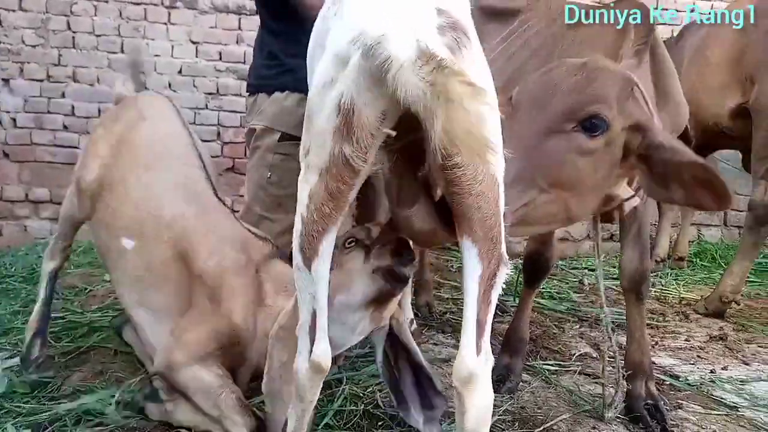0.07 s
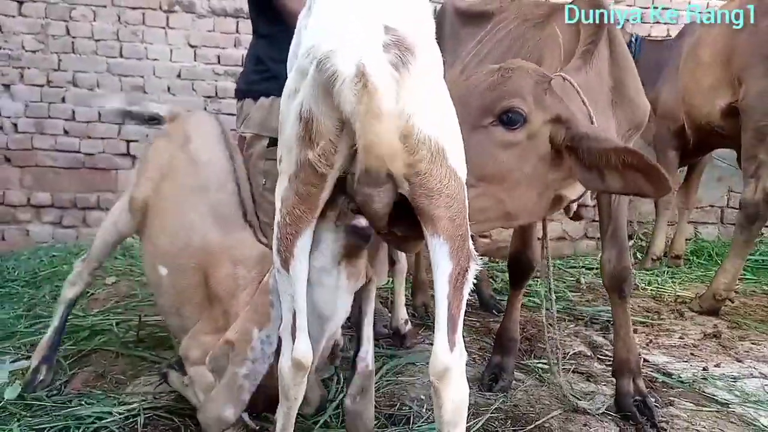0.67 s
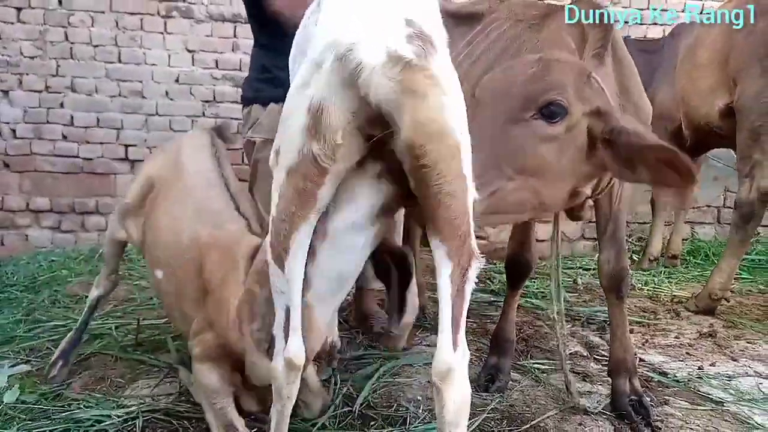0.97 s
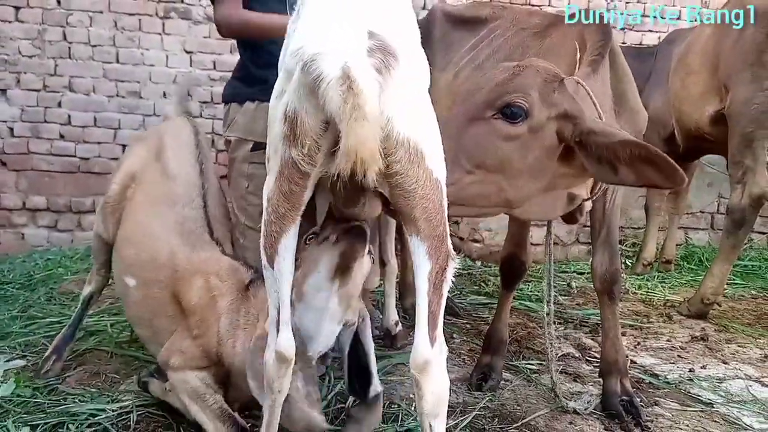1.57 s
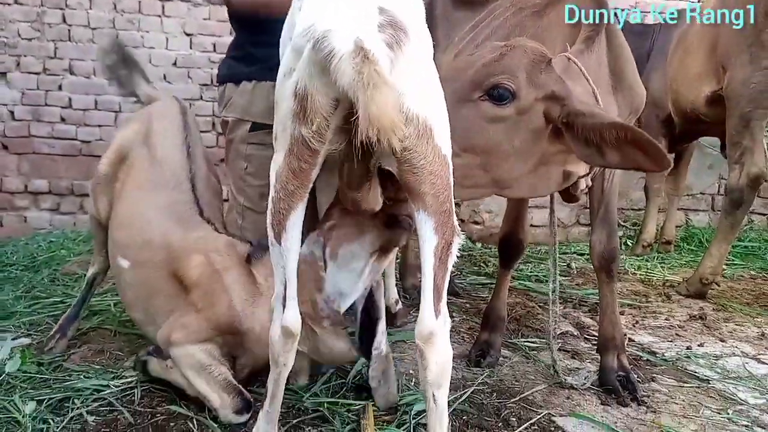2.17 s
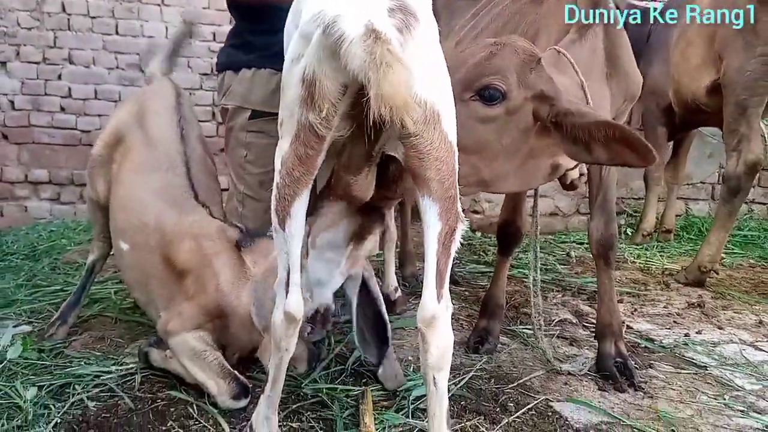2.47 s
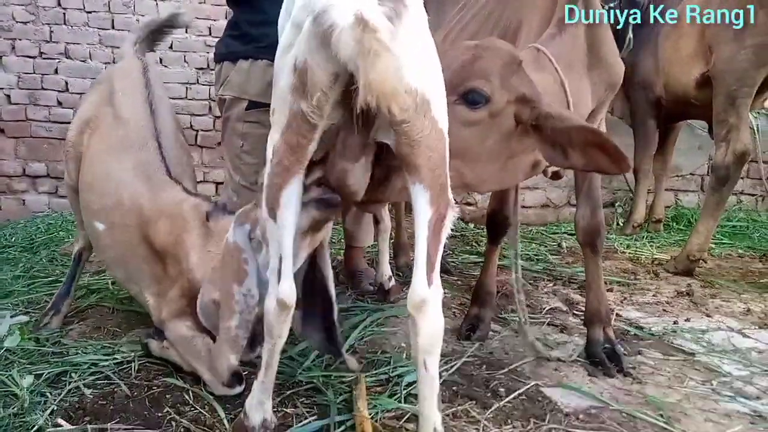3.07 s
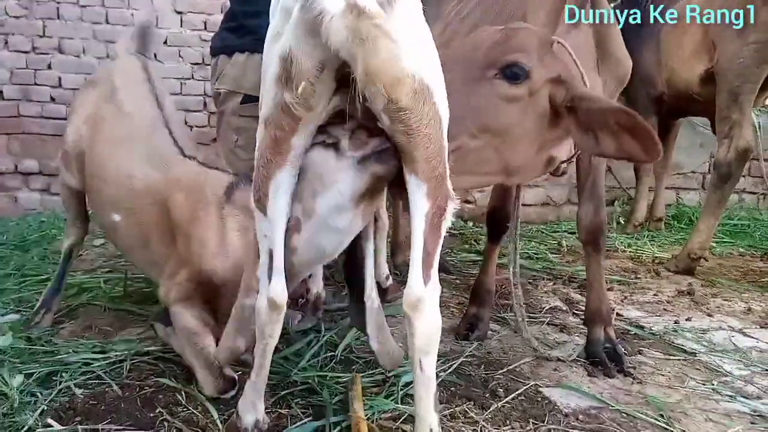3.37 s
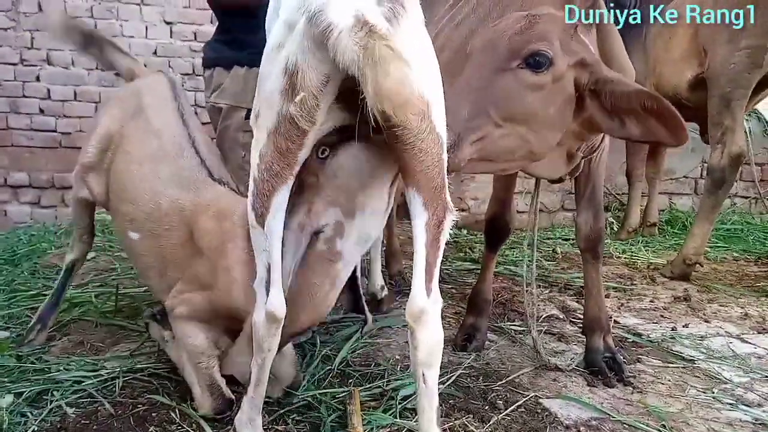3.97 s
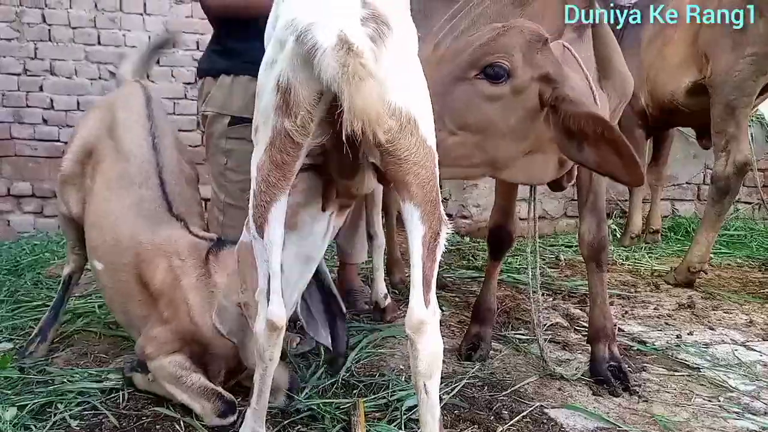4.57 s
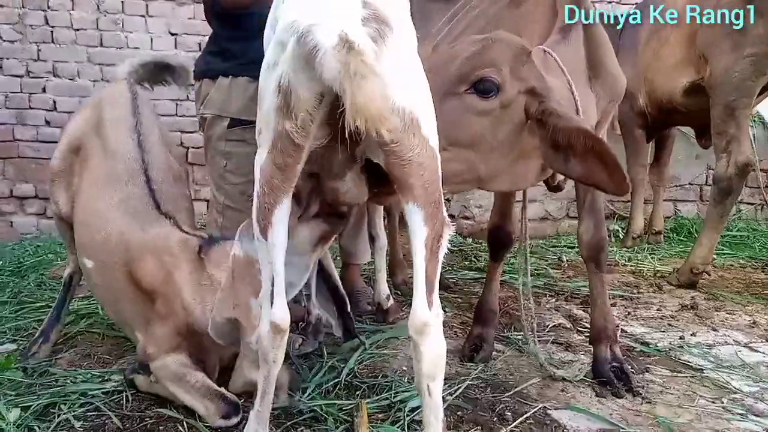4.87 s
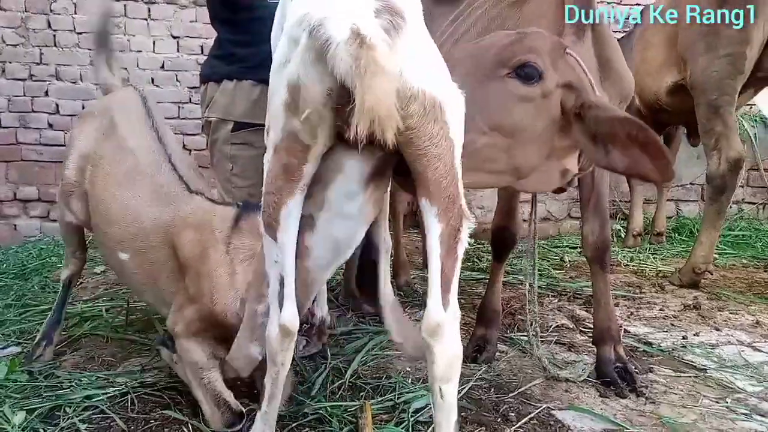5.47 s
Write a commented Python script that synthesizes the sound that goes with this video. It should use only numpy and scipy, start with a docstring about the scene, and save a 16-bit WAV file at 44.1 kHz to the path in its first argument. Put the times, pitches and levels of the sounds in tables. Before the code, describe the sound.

A bird gives four high, raspy, falling whistles while farm animals shuffle and thud on cut grass over a steady outdoor hiss.

```python
"""A brick-walled farmyard. A bird calls four times: each call is a rasp, a clean whistle and a falling slide.
Small birds slur and chip thinly farther off. A suckling young animal and the stock around it shuffle
on cut grass, with soft thuds, rustles and snapping stalks over a steady outdoor hiss and rumble.
Birds are gliding tones, thuds damped resonances, rustles dense clicks; the walls reflect them."""
import sys
import numpy as np
from scipy import signal
from scipy.fft import rfft, irfft, next_fast_len
from scipy.io import wavfile
from scipy.ndimage import uniform_filter1d

SR = 44100
rng = np.random.default_rng(int(sys.argv[2]) if len(sys.argv) > 2 else 0)


def wav_out(sig):
    """Save sig, one row per channel (or a flat mono array), as 16-bit PCM at SR to the path in sys.argv[1]."""
    wavfile.write(sys.argv[1], SR, np.round(np.clip(np.atleast_2d(sig).T, -1, 1) * 32767).astype(np.int16))


N = 242991

# Spectrum of cut grass. Each row: frequency in Hz, relative density in dB.
GRASS_SPECTRUM = [(290, -70.5), (500, -8.5), (941, -1.5), (1010, -0.5), (1250, -6.5), (1770, 3),
                  (2260, 1.5), (2890, 7), (4380, 4.5), (5590, 6), (9510, -2), (13600, -22), (15500, -16)]


def near_bird():
    """Four calls, each with its own pitch and level contour."""
    # Each row: start in seconds; rasp pitch in Hz, bend in Hz/s, level in dB; whistle pitch in Hz,
    # drift in Hz/s, level in dB, crest as a share of its length, start and end in dB re crest;
    # slide level in dB; overtone gain in dB.
    calls = [(.536, 3124, -400, -32.5, 2640, -200, -21, 0.6, -2, -18, -24.5, -3),
             (1.018, 3036, -900, -31, 2672, 148, -20, 0.59, -8.5, -22, -22.5, -4),
             (1.494, 2898, 596.5, -32.5, 2584, -100, -21, 0.69, -11, -30, -24, 0),
             (1.961, 2969, 2413, -31, 2513, 893, -19, 0.34, -5, -40, -24.5, -3.5)]
    return track(syrinx, [(s, call_contour(*shape), facing_db) for s, *shape, facing_db in calls])


def call_contour(rasp_hz, bend_hz_per_s, rasp_db, whistle_hz, drift_hz_per_s, whistle_db,
                 crest, start_db, end_db, slide_db):
    """Pitch, level and roughness: a short rasp, a swelling whistle, a last push as the pitch sinks."""
    rasp_s, whistle_s, slide_s = .075, .128, .11
    t = np.arange(0, rasp_s, 1 / SR)
    onset_db = 20 * np.log10(np.clip(t / .018, 1e-3, 1))
    fade_db = 397 * np.maximum(t - .039, 0)
    rasp = [rasp_hz + bend_hz_per_s * (t - rasp_s / 2),
            rasp_db + onset_db - fade_db,
            np.minimum(.3 + t / .033, 1)]

    t = np.arange(0, whistle_s, 1 / SR)
    off_crest = t / whistle_s - crest
    arch_db = np.where(off_crest < 0, start_db * (off_crest / crest) ** 2,
                       end_db * (off_crest / (1 - crest)) ** 2)
    unsettled = np.exp(-t / .005)  # enters sharp, soft and rough, then locks
    hz = whistle_hz + drift_hz_per_s * (t - whistle_s / 2) + 134 * unsettled
    whistle = [hz, whistle_db + arch_db - 6 * unsettled, .012 + .5 * unsettled]

    t = np.arange(0, slide_s, 1 / SR)
    rest_hz, fall_s, rise_s = 1348, .05, .014  # pitch sinks toward the slack membranes' rest
    push_db = np.interp(t, [0, rise_s], [slide_db - 25.5, slide_db])
    slide = [rest_hz + (hz[-1] - rest_hz) * np.exp(-(t / fall_s) ** 1.3),
             push_db - 336 * np.maximum(t - rise_s, 0),
             np.full(len(t), .13)]
    return uniform_filter1d(np.hstack([rasp, whistle, slide]), size=130, axis=1)


def syrinx(contour, facing_db, jitter=.02, waver=.0026, flutter=.45):
    """The syrinx starts rough with its period doubled, locks into a whistle, then slackens."""
    # Overtones leaving the beak. Each row: frequency in Hz, relative level in dB.
    beak = [(3000, -15), (4200, -24), (5200, -25), (6500, -21.5), (7900, -23), (9000, -41.5),
            (10400, -28.5), (11400, -58), (13200, -52), (15400, -52)]
    # Lines of the rasp. Each row: multiple of half the pitch, relative level in dB.
    half_lines = [(1, -20.5), (3, -12), (5, -12), (7, -26.5)]
    hz, level_db, rough = contour
    count = len(hz)
    shake = jitter * rough * wobble(count, 185) + waver * wobble(count, 210)
    phase = 2 * np.pi * np.cumsum(hz * (1 + shake)) / SR
    slack = np.clip((2440 - hz) / 200, 0, 1)  # slack membranes feed the low overtones
    doubling = rough * (1 - slack)
    slip_rad = .51 * slack * wobble(count, 200)  # uneven cycles blur the slide's overtones
    buzz_db = facing_db + 4 * slack + 7 * doubling
    buzz_db += .46 * (1 - slack) * np.minimum(level_db.max() - level_db, 10)  # overtones swell less
    tone = np.sin(phase)
    for k in range(2, 7):
        overtone_db = at_hz(beak, k * hz) + buzz_db - 2.5 * (k - 3) * slack + 5 * wobble(count, 51)
        tone += gain(overtone_db) * np.sin(k * (phase + slip_rad))
    tone += doubling * sum(gain(db) * np.sin(k * phase / 2) for k, db in half_lines)
    tone *= 1 + flutter * rough ** 2 * wobble(count, 770)  # uneven beats add sidebands
    tone *= gain(3 * slack * wobble(count, 110))  # slack membranes catch and let go
    tone *= gain(1.3 * wobble(count, 62))
    return np.sqrt(2) * gain(level_db) * tone * signal.windows.tukey(count, .03)


def small_birds(slur_hz=7154, fall_hz_per_s=8300, chip_end_ratio=.9):
    """High falling slurs, lower falling chips and one faint, distant rising note."""
    # Each row: start in seconds, length in seconds, relative level in dB, roughness.
    slurs = [(0.801, 0.14, -49.5, 0.85), (1.864, 0.17, -58, .3), (2.213, 0.14, -47.5, 0.89),
             (2.401, 0.11, -46.5, 0.18), (2.584, 0.09, -47, .15), (3.852, 0.12, -47.5, 1.04),
             (5.081, .13, -47, 0.76)]
    # Each row: start in seconds, length in seconds, start pitch in Hz, relative level in dB, roughness.
    chips = [(0.259, 0.038, 4130, -49, 1.54), (.324, .026, 3895, -49.5, 1.82),
             (0.905, .024, 4990, -46.5, 1.6), (0.949, 0.022, 4180, -44.5, 1.6),
             (.989, .02, 3830, -44.5, 1.6), (2.252, 0.098, 3690, -55, 0.3), (2.442, 0.097, 3410, -56, 0.42),
             (2.606, 0.085, 3470, -57, 0.05), (3.243, 0.075, 3750, -57.5, 0.2),
             (3.743, 0.077, 3940, -62.5, 0.25)]
    # Start and length in seconds, start and end pitch in Hz, relative level in dB, roughness.
    rising_note = (5, 0.5, 1290, 1620.5, -65, 1)
    out = np.zeros(N)
    for s, length_s, db, rough in slurs:
        add(out, s, chip(length_s, slur_hz, slur_hz - fall_hz_per_s * length_s, db, rough, sub_db=-20))
    for s, length_s, hz, db, rough in chips:
        add(out, s, chip(length_s, hz, hz * chip_end_ratio, db, rough))
    return out + track(chip, [rising_note])


def flock(count=80, low_hz=2900, high_hz=7200):
    """A far flock twitters at random in short rising notes."""
    rows = []
    for when, pitch, glide, length, loud in rng.random((count, 5)):
        hz = low_hz * (high_hz / low_hz) ** pitch
        rows.append((when * N / SR, .03 + .066 * length, hz, hz * (1.1 + .1086 * glide), -66 + 5 * loud))
    return track(chip, rows)


def chip(length_s, start_hz, end_hz, db, rough=.9, jitter=.0462, sub_db=-16):
    """A gliding, shaky note with a weak partial an octave below."""
    count = int(length_s * SR)
    hz = np.linspace(start_hz, end_hz, count) * (1 + jitter * rough * wobble(count, 270))
    phase = 2 * np.pi * np.cumsum(hz) / SR
    tone = np.sin(phase) + gain(sub_db) * np.sin(phase / 2)
    return gain(db) * unit_rms(tone * signal.windows.tukey(count, .8))


def livestock():
    """Hooves, knees and a butting muzzle strike; legs drag through the grass and break stalks."""
    # Each row: start in seconds, level in dB, low resonance in Hz, upper in dB re low, t60 in seconds.
    thuds = [(.005, -47.5, 554, -19, 0.18), (0.149, -36, 71.7, -3, 0.27), (.578, -39, 625, -10, 0.16),
             (.679, -44, 158.5, -3.5, 0.23), (.721, -42, 177.2, -11, 0.13), (0.754, -39, 157, -20, .05),
             (1.057, -41.5, 152.4, -5.5, 0.12), (1.075, -54, 836, -6, 0.18), (1.585, -49.5, 795, -9, 0.14),
             (2.053, -48, 463, -20, .11), (2.161, -37, 352.6, -3, .13), (2.378, -42.5, 232.5, -10, 0.18),
             (2.45, -36.5, 740, -9, 0.073), (2.48, -39, 231, 2.5, 0.15), (2.982, -45, 216, 0.5, 0.3),
             (3.104, -30, 1720, -17, 0.028), (3.274, -42.5, 233.2, 2.5, 0.3),
             (3.555, -40.5, 1040, -12, 0.072), (4.093, -49.5, 165, 7.5, 0.77),
             (4.139, -45.5, 291, -1.5, 0.54), (4.801, -46, 132, -4, 0.21), (4.841, -46, 218, -5, 0.26),
             (5.056, -46, 142, -25, 0.3), (5.16, -46.5, 207.4, -14, 0.2)]
    # Each row: start in seconds, length in seconds (capped at 1/3), level in dB, tilt in dB/octave.
    rustles = [(-.02, .12, -44, -8.5), (0.086, 0.16, -51, 1), (0.549, 0.18, -47.5, 1),
               (0.664, 0.17, -44.5, -0.5), (.985, 0.19, -43.5, -4.5), (1.062, 0.18, -46, -.5),
               (2.355, 0.063, -48, -6), (2.549, 0.44, -57.5, -10), (2.922, 0.15, -55.5, -9.5),
               (3.063, 0.079, -53, -23), (3.28, 0.22, -50, 1.5), (3.423, 0.21, -48.5, -.5),
               (3.519, .14, -44, -2), (4.091, 0.15, -46.5, -1), (4.177, .12, -44, -1),
               (4.764, .066, -53, -1.5), (4.954, 0.23, -58.5, 5), (5.3, 0.046, -49.5, 2.5)]
    # Each row: start in seconds, peak in dB.
    snaps = [(2.381, -34.5), (2.541, -41), (3.082, -36), (3.276, -32.5), (3.358, -35), (3.822, -37.5),
             (3.901, -37.5), (4.458, -45), (5.166, -38), (5.315, -32), (5.321, -41)]
    return track(thud, thuds) + shuffles() + track(rustle, rustles) + track(snap, snaps)


def shuffles(count=22, low_hz=130, high_hz=600):
    """Faint blows at random as the animals shift their weight."""
    rows = [((k + when) * N / SR / count, -61 + 6 * loud, low_hz * (high_hz / low_hz) ** pitch)
            for k, (when, loud, pitch) in enumerate(rng.random((count, 3)))]
    return track(thud, rows)


def thud(db, hz, upper_db=-4, t60_s=.15):
    """A dull blow on earth or hide sounds a low resonance and a shorter, higher one."""
    low = resonance(db, hz, t60_s, width_octaves=.58)
    upper = resonance(db + upper_db, 2.8 * hz, .62 * t60_s, width_octaves=.47)
    return low + upper


def resonance(db, centre_hz, t60_s, width_octaves, rise_s=.0018):
    """A hollow note in a broad puff of noise, dying quickly."""
    t = np.arange(SR // 3) / SR
    puff = coloured(rng.standard_normal(len(t)),
                    lambda hz: -22 * np.log10(1 + (np.log2(hz / centre_hz) / width_octaves) ** 4 / 2))
    note = .39 / width_octaves * np.sqrt(2) * np.sin(2 * np.pi * centre_hz * t)
    slip_db = -1.1 * wobble(len(t), 160)  # contact slips and smacks
    fade = (1 - np.exp(-t / rise_s)) * gain(slip_db - 60 * t / t60_s)
    return gain(db) * unit_rms((puff + note) * fade) * np.sqrt(np.mean(fade ** 2))


def rustle(length_s, db, tilt_db_per_octave, knee_hz=2000):
    """Blades rub and break in clumps of tiny clicks as a leg drags through them."""
    count = SR // 3
    clicks = crackle(count, per_s=14000, spread_db=-1) * gain(1.6 * wobble(count, 79))
    sound = coloured(clicks, lambda hz: at_hz(GRASS_SPECTRUM, hz)
                     + tilt_db_per_octave * np.log2(np.maximum(hz / knee_hz, 1)))
    sound = patchy(sound, depth_db=3.5)[:int(length_s * SR)]
    return gain(db) * unit_rms(sound * signal.windows.tukey(len(sound), .7))


def snap(peak_db, t60_s=.052):
    """One stalk cracks in a short burst of noise."""
    t = np.arange(SR // 16) / SR
    crack = noise(len(t), GRASS_SPECTRUM) * gain(-60 * t / t60_s)
    return gain(peak_db) * crack / abs(crack).max()


def echoes(x):
    """Single reflections from the ground and the near walls."""
    # Each row: delay in seconds, gain in dB.
    reflections = [(.0047, -18), (.013, -10), (.021, -12), (0.031, -19.5), (.046, -17.5), (.061, -17)]
    return track(lambda db: gain(db) * x, reflections)


def yard_reverb(x, build_s=.0046, taps_per_s=2500):
    """Scattered reflections between the walls, each band dying at its own speed."""
    # Each row: frequency in Hz, t60 in seconds.
    decay_times = [(150, 0.28), (1500, 0.51), (2700, 0.57), (7000, 0.48), (14000, 0.04)]
    count = SR * 3 // 4
    taps = rng.choice([-1., 1.], count) * (rng.random(count) < taps_per_s / SR)
    hz, t, bands = signal.stft(taps, SR, nperseg=256)
    envelope = (1 - np.exp(-t / build_s)) * gain(-60 * t / at_hz(decay_times, hz)[:, None])
    tail = signal.istft(bands * envelope, SR, nperseg=256)[1]
    return signal.fftconvolve(x, tail / np.linalg.norm(tail))[:N]


def hiss(body_hz=3000, extra_swing=.42):
    """Background hiss that swells and sinks, dipping around some of the loud whistles."""
    # Each row: frequency in Hz, relative density in dB.
    spectrum = [(240, -6), (400, -11), (595, -7), (796, -14.5), (1260, -6), (1380, -3.5), (2470, -1),
                (2590, -0.5), (3570, 0), (5820, 4.5), (7910, -1.5), (13300, -26), (15500, -22.5)]
    # Each row: time in seconds, level in dB.
    levels = [(0, -49.5), (1, -48.5), (1.35, -54), (1.65, -55.5), (1.93, -49.5), (2.13, -53.5),
              (2.5, -46.5), (2.75, -52), (3.2, -49), (3.55, -54), (3.73, -56), (4.2, -51), (4.72, -53.5),
              (5.1, -49.5), (5.5, -49.5)]
    air = patchy(noise(N, spectrum), depth_db=2.5)
    level_db = over_time(levels)
    body = signal.sosfiltfilt(signal.butter(2, body_hz, fs=SR, output="sos"), air)
    body_gain = gain(extra_swing * (level_db - level_db.mean()))  # the low band swings further
    return gain(level_db) * (air - body + body * body_gain)


def rumble(boost_db=4.5, surge_db=2):
    """A lumpy, distant low noise."""
    # Each row: frequency in Hz, relative density in dB.
    spectrum = [(20, -50), (40, -29), (66, -1.5), (90, -2.5), (112, 5), (135, -5.5), (175, -6.5),
                (280, -31), (600, -21), (1200, -50)]
    # Each row: time in seconds, relative level in dB.
    levels = [(0.0, -61.5), (0.66, -69), (0.92, -61.5), (1.23, -69), (2.59, -56.5), (3.0, -64.5),
              (3.19, -54.5), (3.43, -62), (4.15, -56), (4.58, -70), (4.9, -56.5), (5.5, -78)]
    return noise(N, spectrum) * gain(boost_db + over_time(levels) + surge_db * wobble(N, 25))


def stalk_ticks(db=-67):
    """Stalks tick under standing animals."""
    clicks = crackle(N, per_s=110, spread_db=12.5)
    return gain(db) * coloured(clicks, lambda hz: at_hz(GRASS_SPECTRUM, hz))


def gain(db):
    """Decibels to amplitude."""
    return 10 ** (np.asarray(db) / 20)


def unit_rms(x):
    """Scales to rms 1."""
    return x / np.sqrt(np.mean(x ** 2) + 1e-20)


def at_hz(points, hz):
    """Reads a table on a log-frequency axis."""
    table_hz, value = np.transpose(points)
    return np.interp(np.log(hz + 1), np.log(table_hz + 1), value)


def over_time(points):
    """Reads a table of times and values at every sample."""
    return np.interp(np.arange(N) / SR, *np.transpose(points))


def coloured(x, db_at):
    """Filters x by a function from Hz to dB; rms 1."""
    size = next_fast_len(len(x))
    hz = np.maximum(np.fft.rfftfreq(size, 1 / SR), 1)
    return unit_rms(irfft(rfft(x, size) * gain(db_at(hz)), size)[:len(x)])


def noise(count, spectrum):
    """Noise shaped by a spectrum table; rms 1."""
    return coloured(rng.standard_normal(count), lambda hz: at_hz(spectrum, hz))


def wobble(count, rate_hz):
    """Smooth random motion up to rate_hz; rms about 1."""
    white = rng.standard_normal(count + SR // 4)
    return coloured(white, lambda hz: -10 * np.log10(1 + (hz / rate_hz) ** 6))[:count]


def crackle(count, per_s, spread_db):
    """A random train of clicks of uneven size."""
    size = gain(spread_db * np.minimum(rng.exponential(1, count), 4))
    return unit_rms(size * rng.choice([-1, 1], count) * (rng.random(count) < per_s / SR))


def patchy(x, depth_db):
    """Lets a noise drift in level in patches of a few hundred Hz by a tenth of a second."""
    bands = signal.stft(x, nperseg=1024, noverlap=768)[2]
    patches = uniform_filter1d(rng.standard_normal(bands.shape), size=8, axis=0)
    patches = unit_rms(uniform_filter1d(patches, size=16, axis=1))
    bands *= gain(depth_db * patches)
    return unit_rms(signal.istft(bands, nperseg=1024, noverlap=768)[1][:len(x)])


def add(mix, start_s, sound):
    """Adds a sound at start_s, cut to the mix."""
    at = round(start_s * SR)
    sound = sound[max(-at, 0):]
    part = mix[max(at, 0):][:len(sound)]
    part += sound[:len(part)]


def track(source, rows):
    """Plays one event a row: start in seconds, then the source's arguments."""
    out = np.zeros(N)
    for start_s, *settings in rows:
        add(out, start_s, source(*settings))
    return out


def scene():
    """The caller near, the small birds farther and wetter, the animals close by."""
    caller = near_bird()
    chips = small_birds() + flock()
    animals = livestock()
    birds = caller + gain(2) * chips
    wet = yard_reverb(gain(-16.5) * caller + gain(-4.5) * chips + gain(-13.5) * animals)
    return (birds + echoes(birds) + animals + wet + hiss() + rumble() + stalk_ticks())[None]


def record(dry, edge_hz=15600):
    """The recorder's band limit."""
    lowpass = signal.firwin(511, edge_hz, window=("kaiser", 9), fs=SR)
    return signal.oaconvolve(dry, lowpass[None], "same")


dry = scene()
out = record(dry)
wav_out(out)
```